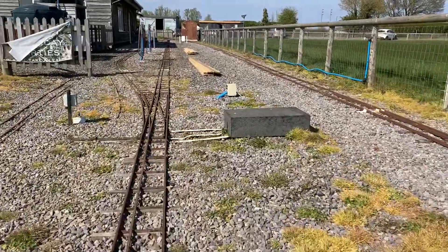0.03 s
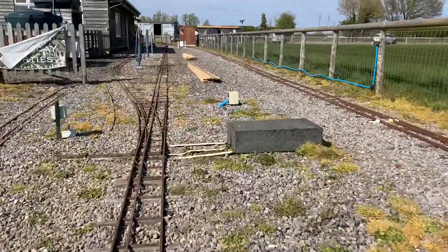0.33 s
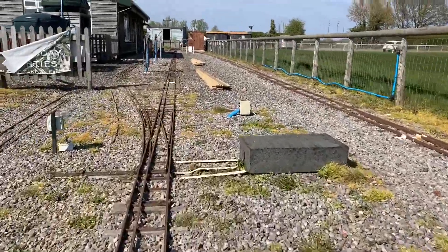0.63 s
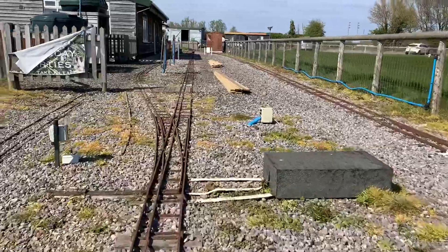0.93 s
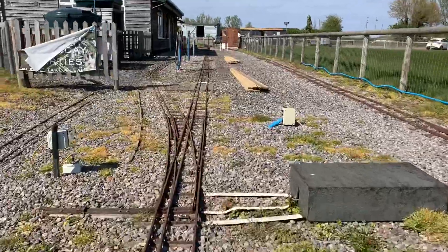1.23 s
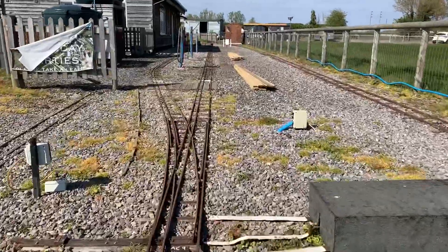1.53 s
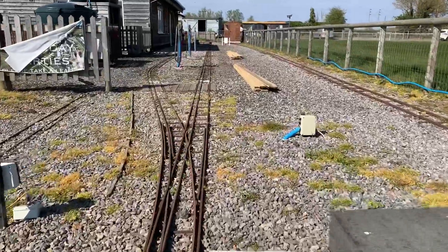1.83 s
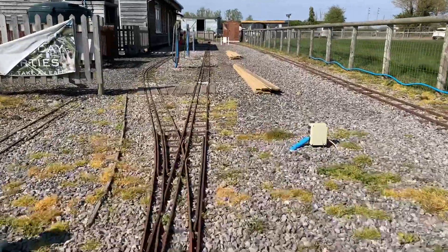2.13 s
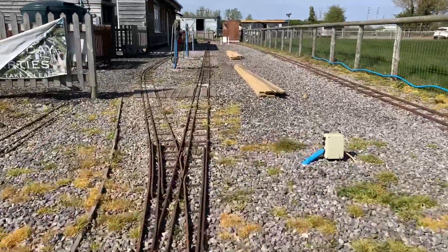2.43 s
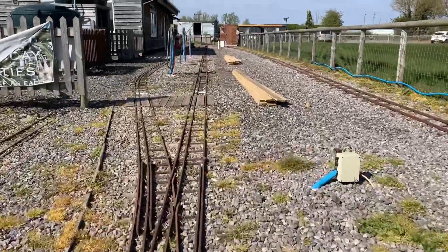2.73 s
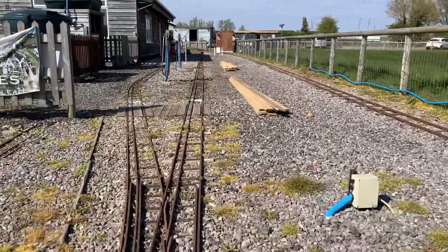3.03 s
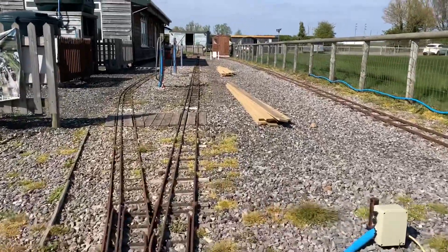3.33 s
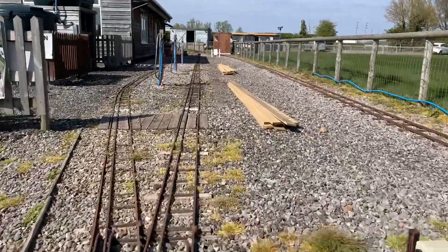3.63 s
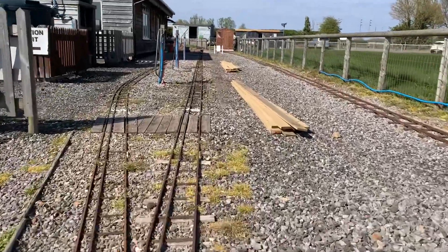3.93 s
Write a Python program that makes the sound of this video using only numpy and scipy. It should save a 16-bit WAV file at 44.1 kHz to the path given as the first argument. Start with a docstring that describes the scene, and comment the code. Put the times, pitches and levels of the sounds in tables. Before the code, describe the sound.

A miniature train rumbles along outdoors, heard from on board. From the start its wheels hiss, scrape and chirp briefly, knocking over rail joints while wind buffets the microphone. Near 1 second the car clatters hard over points. From about 1.8 seconds a loose part buzzes faintly in spells. Light metal clinking swells near 2.4 seconds, and grit cracks sharply at 2.6. Around 3.5 seconds the car clatters over points again.

```python
"""A miniature train ride over points in narrow track, outdoors. From the start the wheels hiss and ring,
flanges scrape and chirp, the car rumbles and knocks over joints, and air buffets the microphone. Near 1 s the
points shake the car hard. From about 1.8 s a buzz comes in spells; near 2.4 s clinking metal swells, then grit
gives its loudest crack. Near 3.5 s the car shakes and knocks over points again."""
import sys
import numpy as np
from scipy import signal
from scipy.fft import rfft, irfft
from scipy.io import wavfile
from scipy.ndimage import uniform_filter1d

SR = 44100
rng = np.random.default_rng(int(sys.argv[2]) if len(sys.argv) > 2 else 0)


def digitize_waveform(pressure):
    """Quantize a signal to 16-bit integers and store it at the path in sys.argv[1].

    Rows of a 2-D input are taken as channels; values are limited to [-1, 1].
    """
    field = np.atleast_2d(pressure).T
    bounded = np.clip(field, -1, 1)
    quanta = np.round(bounded * 32767).astype(np.int16)
    wavfile.write(sys.argv[1], SR, quanta)


N = 176400
T = np.arange(N) / SR
BINS_HZ = np.arange(N // 2 + 1) * SR / N
SIDE_SIGN = np.array([[1], [-1]])  # left, right
GRAINS_PER_S = 2500

# Noise spectra. Each row: frequency in Hz, relative density in dB.
RUMBLE_SPECTRUM = [(22, -29), (35, -35), (50, -2), (72, 0.5), (110, -6), (160, -6.5), (220, -8),
                   (320, -17.5), (1200, -70)]
TICK_SPECTRUM = [(400, -18), (1500, 10), (4000, 4), (7000, 0.5), (9000, 7), (15000, -14)]
ROLL_SPECTRUM = [(100, 6.5), (400, 8.5), (800, 0), (1300, 1), (2100, -3.5), (2800, -9.5), (3600, -19.5),
                 (4800, -14.5), (5500, -21.5), (6500, -20), (8600, -22.5), (11000, -24), (15000, -28.5)]
SCRAPE_SPECTRUM = [(200, 24), (500, 13.5), (2100, 10), (2900, 3.5), (4800, -4), (5600, -4.5), (6500, -9),
                   (8500, -7), (10000, -30), (12500, -11.5), (15000, -26)]
SHAKE_SPECTRUM = [(60, -61), (150, -2.5), (250, 0), (380, -0.5), (520, -7), (680, -7), (850, -23.5),
                  (1300, -19.5), (2500, -57), (6000, -84)]
# Stereo image of the noises. Each row: frequency in Hz, left-right correlation (clipped to +-1 in use).
STEREO_CORRELATION = [(90, 0.64), (160, -0.025), (250, -0.34), (430, 0.65), (530, 0.42), (850, -0.13),
                      (1350, 0.53), (1800, -0.24), (3400, -0.017), (4800, 0.62), (5600, -0.88),
                      (6300, 0.56), (8500, -0.57), (10500, -1.72), (12200, .95)]
# Balance of the body's thuds. Each row: frequency in Hz, left minus right in dB.
BODY_BALANCE = [(280, 1.4), (600, -1), (850, -6), (1800, 2.5)]
# Lurches and air buffets. Each row: peak time in seconds, level in dB.
THUMPS = [(0.04, -16), (.239, -17.5), (0.323, -14), (.462, -13.5), (.593, -18), (.856, -10), (.985, -18),
          (1.096, -13.5), (1.144, -17.5), (1.246, -7.5), (1.374, -13.5), (1.501, -10.5), (1.704, -11.5),
          (1.746, -16), (1.932, -12), (2.03, -12), (2.094, -9.5), (2.361, -13.5), (2.637, -12.5),
          (2.965, -12.5), (3.152, -12), (3.434, -10.5), (3.676, -14.5), (3.793, -13)]
# Modes of loose metalwork, in Hz.
CLINK_MODES_HZ = [1048, 1164, 1300, 1406, 1920]
# Buzzing spells. Each row: peak time in seconds, length in seconds, level in dB.
RATTLES = [(1.876, .14, -46), (2.446, 0.16, -44.5), (2.75, 0.33, -48), (3.257, .25, -50)]
# Grit cracks. Each row: start in seconds, relative level in dB.
TICKS = [(0.849, -32), (1.677, -27.5), (1.808, -31.5), (2.256, -29.5), (2.631, -18)]
# Flange chirps. Each row: peak time in seconds, pitch in Hz, length in seconds, level in dB,
# resonator width in Hz.
CHIRPS = [(0.191, 2370, 0.038, -30.5, 400), (0.638, 2500, 0.013, -28, 300), (1.559, 4210, 0.021, -36, 160),
          (3.736, 1180, 0.0092, -26, 220)]
# Flange scrapes. Each row: peak time in seconds, length in seconds, relative level in dB.
SCRAPES = [(0.192, 0.027, -32), (0.219, 0.12, -38), (0.382, 0.039, -30), (0.427, 0.09, -33),
           (0.769, 0.072, -33), (0.864, 0.033, -32.5), (0.976, 0.054, -30.5), (1.173, 0.021, -36),
           (1.357, 0.039, -35), (1.538, 0.062, -33), (1.89, 0.048, -36.5), (2.182, 0.07, -38.5),
           (2.452, 0.075, -37), (2.642, 0.053, -36), (2.977, 0.06, -37.5), (3.099, 0.045, -35.5),
           (3.2, 0.19, -38.5), (3.36, 0.028, -35.5), (3.704, 0.13, -38), (3.827, 0.04, -35),
           (3.918, 0.037, -38)]
# Wheel modes. Each row: frequency in Hz, width in Hz, mean level without scraping in dB.
WHEEL_MODES = [(1330, 80, -43.5), (3138, 93, -51), (4131, 36, -52), (6160, 140, -58.5), (8150, 70, -66)]
# Shaking of the car, strongest over points. Each row: time in seconds, relative level in dB.
SHAKE_CURVE = [(0, -29), (.28, -33), (.6, -36), (.88, -30.5), (.97, -16.5), (1.11, -18.5), (1.17, -31),
               (1.34, -24.5), (1.42, -33.5), (1.82, -42), (2.08, -27.5), (2.4, -28.5), (2.47, -37.5),
               (3.03, -34), (3.14, -27.5), (3.29, -43.5), (3.48, -19.5), (3.595, -23), (3.645, -17),
               (3.73, -34.5), (3.92, -36.5), (4, -16)]
# Joint knocks. Each row: start in seconds, relative level in dB, initial pitch in Hz, ring share 0-1.
KNOCKS = [(0.1, -17, 500, 0.1), (.13, -10, 440, 0.27), (.453, -5, 394, 0), (0.898, -14, 400, .3),
          (0.922, -9.5, 233, 0.2), (.962, -10, 310, 0.8), (0.986, -10, 230, 0.8), (1.043, -2, 347, 0.2),
          (1.054, -8.5, 710, 0), (1.087, -8, 236, 0.6), (1.099, -8, 440, 0.23), (1.117, -4, 579, 0.33),
          (1.215, -6.5, 420, 0.52), (1.284, -8, 228, 0.9), (1.320, -8, 318, 0.24), (1.36, -6.5, 485, 1),
          (2.007, -6.5, 301, 0.2), (2.079, -11, 407, 1), (2.278, -8, 289, 0.3), (2.53, -8, 362, 0.49),
          (2.942, -10, 230, 0.3), (3.132, -6, 269, 0.43), (3.421, -10, 345, 0), (3.453, -5.5, 395, 0.43),
          (3.5, -7.5, 433, 0.06), (3.525, -10, 387, 0.4), (3.55, -5.5, 347, 0.8), (3.612, -10, 472, 0.34),
          (3.85, -7, 320, 0.17), (3.867, -6, 377, .2)]


def from_db(db):
    """Decibels to gain."""
    return 10 ** (np.asarray(db) / 20)


def unit_rms(x):
    """Scale to unit power."""
    return x / np.sqrt(np.mean(x ** 2) + 1e-20)


def over_time(rows):
    """A control curve, per sample."""
    return np.interp(T, *np.transpose(rows))


def over_bins(rows):
    """A table per FFT bin, interpolated in log frequency."""
    hz, value = np.transpose(rows)
    return np.interp(np.log(BINS_HZ + 1), np.log(hz), value)


def drift(corner_hz):
    """Smooth random curve, unit RMS."""
    return unit_rms(irfft(rfft(rng.standard_normal(N)) / (1 + (BINS_HZ / corner_hz) ** 2), N))


def swell(peak_s, length_s, tail=1):
    """A rounded rise, and a fall `tail` times as long."""
    width_s = np.where(T < peak_s, length_s, length_s * tail)
    return np.exp(-np.minimum((2 * (T - peak_s) / width_s) ** 2, 20))


def grains(per_s, spread_db, noise_gain):
    """Two trains of uneven random contacts over smooth noise."""
    hits = rng.random(N) < per_s / SR
    sizes = from_db(spread_db * np.minimum(rng.exponential(1, N), 4))
    contacts = unit_rms(hits * sizes * rng.standard_normal((2, N)))
    return contacts + noise_gain * rng.standard_normal((2, N))


def stereo(pair, side_gain):
    """Mid and side to left and right."""
    return pair[0] + side_gain * pair[1] * SIDE_SIGN


def coloured(pair, spectrum):
    """Two unrelated signals to stereo with a given spectrum, unit power."""
    mid, side = rfft(pair) * from_db(over_bins(spectrum))
    correlation = np.clip(over_bins(STEREO_CORRELATION), -1, 1)
    left_right = np.sqrt(1 + correlation) * mid + np.sqrt(1 - correlation) * side * SIDE_SIGN
    return unit_rms(irfft(left_right, N))


def evened(x, share, samples):
    """Remove a share of a noise's level swings."""
    power = uniform_filter1d(uniform_filter1d(np.mean(x ** 2, axis=0), samples), samples)
    return unit_rms(x / (np.abs(power) + 1e-9) ** (share / 2))


def resonator(x, hz, width_hz):
    """One resonance, unit power."""
    radius = np.exp(-np.pi * width_hz / SR)
    feedback = [1, -2 * radius * np.cos(2 * np.pi * hz / SR), radius * radius]
    return unit_rms(signal.lfilter([1, 0, -1], feedback, x + 1e-18))


def rumble(mean_db=-19, shake_share=0.43):
    """Low noise of the car's body and the air on the microphone, growing with the shaking."""
    shake_db = over_time(SHAKE_CURVE)
    noise = evened(coloured(rng.standard_normal((2, N)), RUMBLE_SPECTRUM), share=0.99, samples=1300)
    return noise * from_db(mean_db + shake_share * (shake_db - shake_db.mean()) + 1.5 * drift(9))


def thumps(hz=99.8, length_s=0.038):
    """Each lurch or air buffet is a few uneven low swings, slightly different left and right."""
    wobble_rad = drift(45) + 0.43 * drift(51) * SIDE_SIGN
    envelope = sum(from_db(db) * swell(peak_s, length_s, tail=0.97) for peak_s, db in THUMPS)
    return np.sqrt(2) * envelope * np.sin(2 * np.pi * hz * T + wobble_rad)


def clinks(per_s=60, base_db=-45.5, crossing_db=3.5):
    """Loose metal touches, loudest on the crossing; each touch rings the modes in its own mix."""
    touches = rng.random(N) < per_s / SR
    modes = sum(resonator(touches * rng.uniform(-1.18, 1, (2, N)), hz, width_hz=26) / hz
                for hz in CLINK_MODES_HZ)
    crossing = swell(peak_s=2.42, length_s=0.64, tail=2.8)
    return unit_rms(stereo(modes, 0.6)) * from_db(base_db + crossing_db * crossing)


def rattle(per_s=100, modes_hz=(3060, 4850, 4650)):
    """A buzz: quick, uneven taps on bright resonances."""
    tap_count = np.floor(np.cumsum(per_s * (1 + 0.59 * drift(60))) / SR)
    taps = np.diff(tap_count, prepend=0)
    buzz = sum(resonator(taps * from_db(2 * rng.standard_normal(N)), hz, width_hz=220) for hz in modes_hz)
    spells = sum(from_db(db) * swell(peak_s, length_s) for peak_s, length_s, db in RATTLES)
    return unit_rms(buzz) * spells


def grit_ticks(rise_s=0.00087, decay_s=0.0044, tail_s=0.0069, tail_db=-16):
    """Grit cracks under a wheel: a sharp burst with a short tail."""
    envelope = 0
    for start_s, db in TICKS:
        age_s = np.clip(T - start_s, 0, 0.2)
        fall = np.exp(-age_s / decay_s) + from_db(tail_db) * np.exp(-age_s / tail_s)
        envelope += from_db(db + 0.5) * np.minimum(age_s / rise_s, 1) * fall
    return envelope * coloured(rng.standard_normal((2, N)), TICK_SPECTRUM)


def flange_chirps():
    """A flange sticks and slips, exciting a resonance: narrow sings, wide grates."""
    out = 0
    for peak_s, hz, length_s, db, width_hz in CHIRPS:
        band = resonator(rng.standard_normal((2, N)), hz, width_hz)
        tone = stereo(resonator(band, hz, width_hz), 0.5)
        out += evened(tone, share=1, samples=300) * swell(peak_s, length_s) * from_db(db)
    return out


def wheels(roll_db=-31, ring_doubling_db=-38):
    """Steady rolling hiss, gritty flange scrapes, and wheel modes that ring louder in a scrape."""
    rub = np.sqrt(sum((from_db(db) * swell(peak_s, length_s, tail=1.19)) ** 2
                      for peak_s, length_s, db in SCRAPES))
    roll = coloured(grains(GRAINS_PER_S, spread_db=1.5, noise_gain=1), ROLL_SPECTRUM)
    roll *= from_db(roll_db + 2.93 * drift(15.4))
    scrape = coloured(grains(GRAINS_PER_S, spread_db=5, noise_gain=0.8), SCRAPE_SPECTRUM)
    scrape *= rub * from_db(11.5 + 1.35 * drift(64))
    ring = 0
    for hz, width_hz, db in WHEEL_MODES:
        grit = grains(GRAINS_PER_S / 10, spread_db=3, noise_gain=0.34)
        mode = unit_rms(stereo(resonator(grit, hz, width_hz), 0.75))
        ring += mode * from_db(db + 1.5 * drift(11))
    ring *= np.hypot(1, rub / from_db(ring_doubling_db))  # twice the power at this rub level
    return roll + scrape + ring


def shaking(jolts_per_s=260):
    """Dense small jolts set the car's body thudding."""
    jolts = coloured(grains(jolts_per_s, spread_db=4, noise_gain=0.37), SHAKE_SPECTRUM)
    return evened(jolts, share=1, samples=900) * from_db(over_time(SHAKE_CURVE) + 3)


def joint_knocks(attack_s=0.0018, decay_s=0.011, sag_per_s=10.86, band_ratio=1.427, samples=6000):
    """Each rail joint gives a heavily damped ring that sags in pitch, inside a noise burst."""
    out = np.zeros((2, N + SR))
    age_s = np.arange(samples) / SR
    envelope = np.minimum(age_s / attack_s, 1) * np.exp(-np.maximum(age_s - attack_s, 0) / decay_s)
    for start_s, db, hz, ring_share in KNOCKS:
        band = signal.butter(2, [hz / band_ratio, hz * band_ratio], "band", fs=SR, output="sos")
        noise = signal.sosfilt(band, rng.standard_normal((2, 2 * samples)))[:, samples:]
        burst = evened(stereo(noise, 0.84), share=0.27, samples=300)
        phase_rad = 2 * np.pi * np.cumsum(hz * np.exp(-sag_per_s * age_s)) / SR
        ring = np.sqrt(2) * np.sin(phase_rad + rng.normal(0, 0.35, (2, 1)))
        knock = np.sqrt(1 - ring_share) * burst + np.sqrt(ring_share) * ring
        start = int(start_s * SR)
        out[:, start:start + samples] += knock * envelope * from_db(db - 3.5)
    return out[:, :N]


def scene():
    """Everything heard from the car; the body's thuds lean right around 850 Hz."""
    balance = from_db(over_bins(BODY_BALANCE) * SIDE_SIGN / 2)
    body = irfft(rfft(shaking() + joint_knocks()) * balance, N)
    return rumble() + thumps() + body + wheels() + flange_chirps() + grit_ticks() + rattle() + clinks()


def record(dry, highpass_hz=30, ceiling=0.95, lowpass_hz=15500):
    """Cut the deepest bass, round the highest peaks, cut the top."""
    highpassed = signal.sosfilt(signal.butter(2, highpass_hz, "high", fs=SR, output="sos"), dry)
    rounded = highpassed / (1 + (highpassed / ceiling) ** 6) ** (1 / 6)
    return signal.sosfilt(signal.ellip(10, 0.1, 80, lowpass_hz, fs=SR, output="sos"), rounded)


dry = scene()
out = record(dry)
digitize_waveform(out)
```